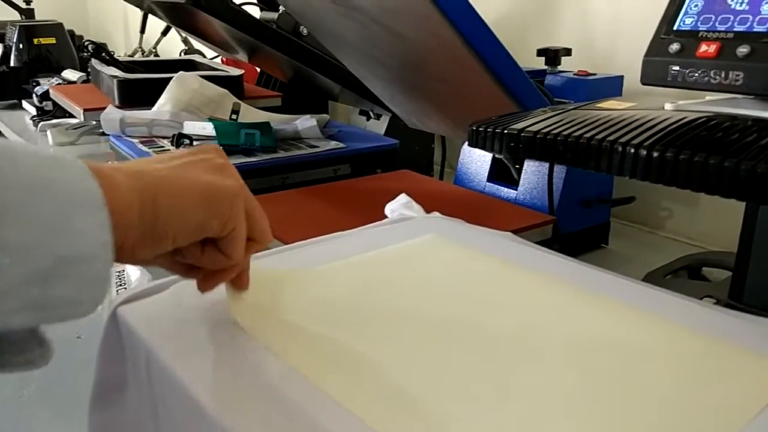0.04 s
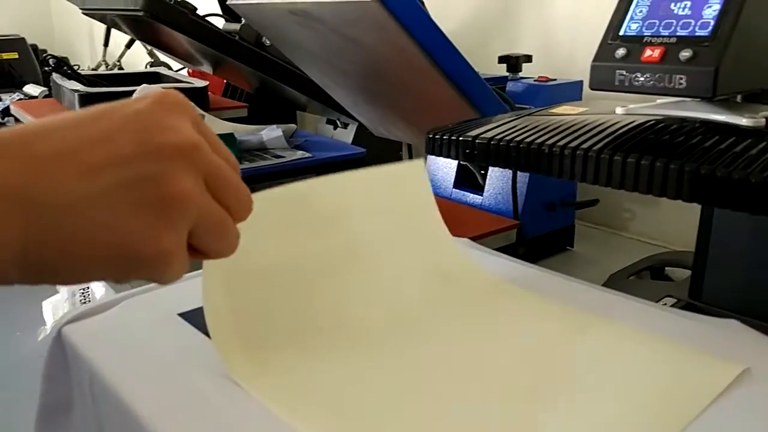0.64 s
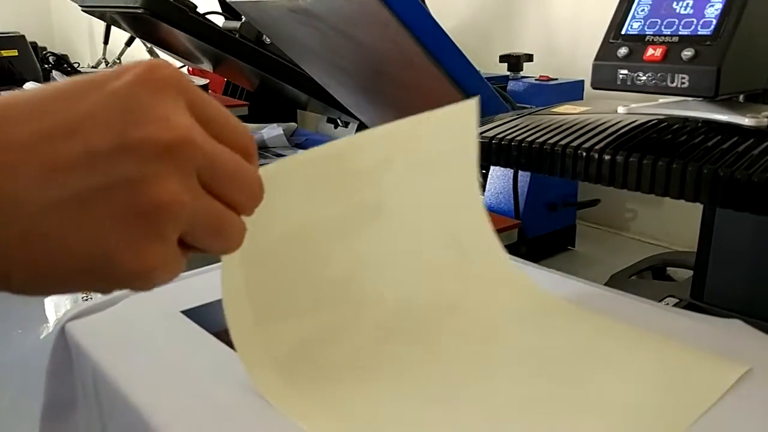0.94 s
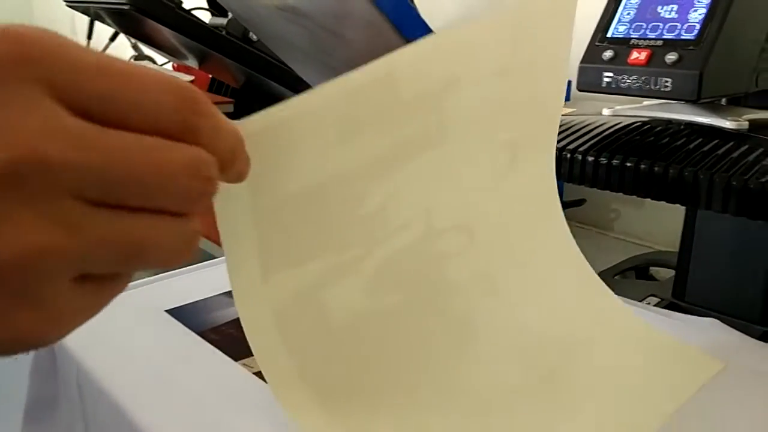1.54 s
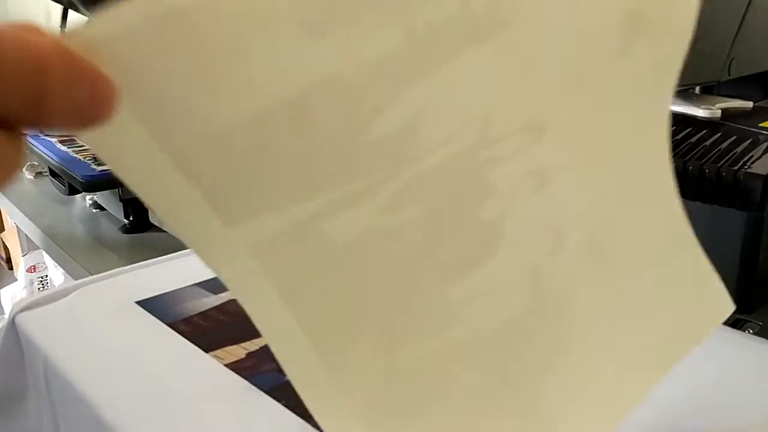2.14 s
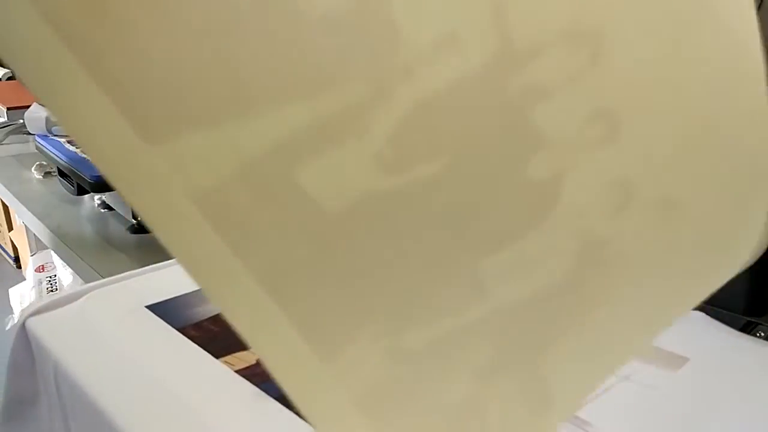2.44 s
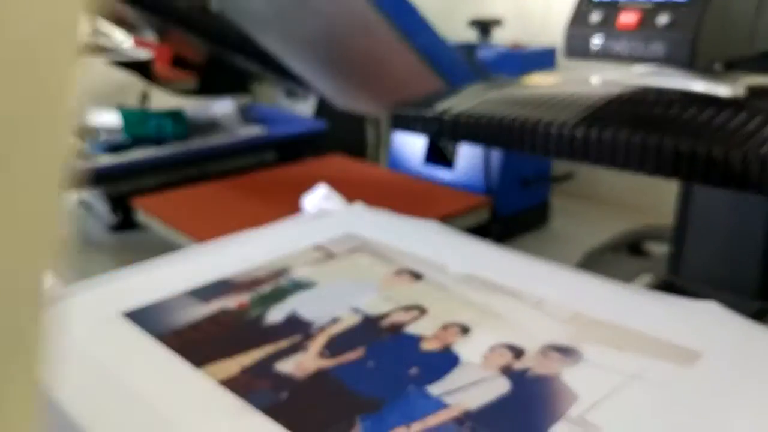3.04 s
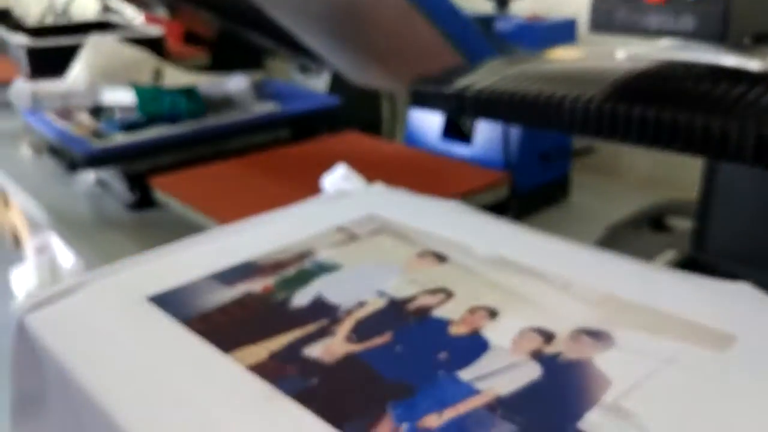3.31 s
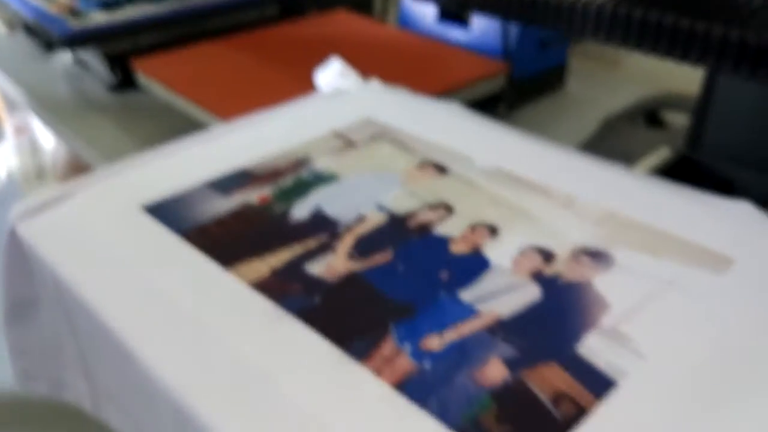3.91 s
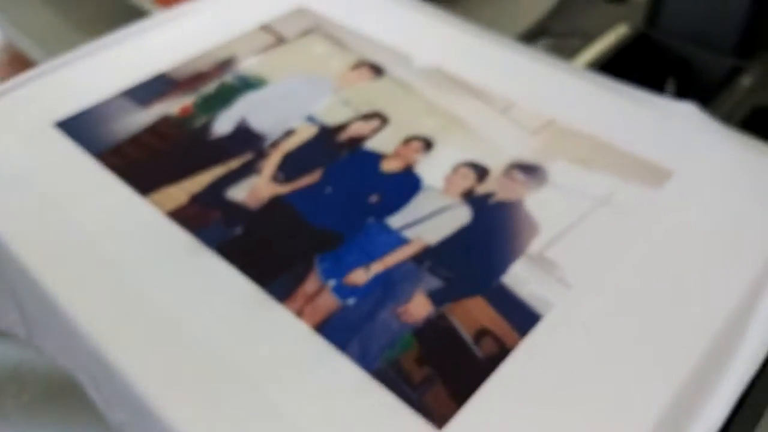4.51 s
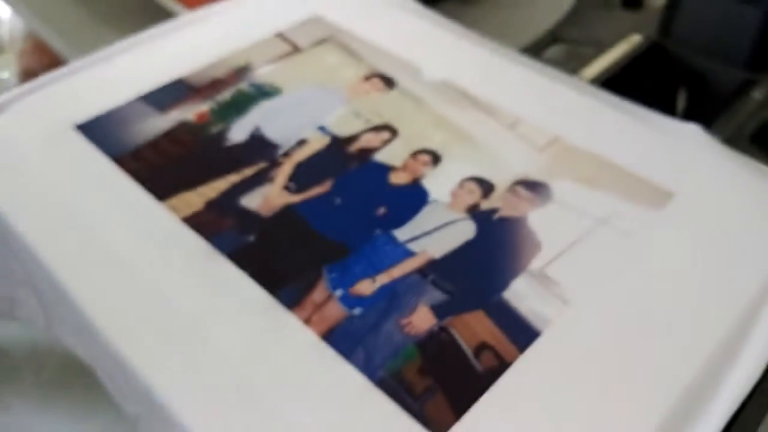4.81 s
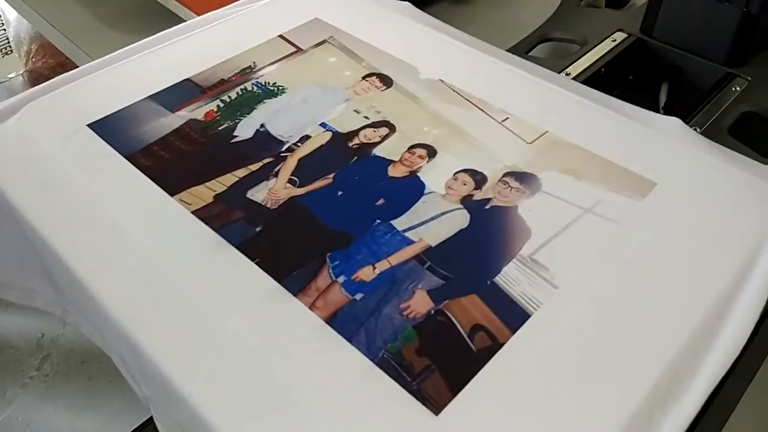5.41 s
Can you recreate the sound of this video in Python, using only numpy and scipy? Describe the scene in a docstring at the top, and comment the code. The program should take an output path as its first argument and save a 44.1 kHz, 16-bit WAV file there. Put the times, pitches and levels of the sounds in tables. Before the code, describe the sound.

A small pump on a heat press hums with a rattling buzz while transfer paper hisses faintly off a shirt. After a light tap, a switch snaps and the pump quickly runs down. About a second later something hollow clacks and bounces, and a dull knock follows. Soft paper and cloth rustles and a few faint ticks continue over the low rumble and hiss of a quiet workshop, all heard from nearby.

```python
"""A small pump on a heat press hums, its valves rattling the housing, while transfer paper hisses
off a printed shirt. After a light tap, a switch snaps at 1.8 s and the pump runs down in a few
last strokes. Near 2.7 s something hollow clacks and bounces, and a dull knock follows.
Then paper and cloth rustle softly, with a few faint ticks, over the rumble and hiss of the room."""
import sys
import numpy as np
from scipy import signal
from scipy.fft import irfft, next_fast_len
from scipy.io import wavfile

SR = 44100
rng = np.random.default_rng(int(sys.argv[2]) if len(sys.argv) > 2 else 0)


def unload_wav(signal):
    """Save mono or channel-first audio to the path in sys.argv[1] as 16-bit WAV at rate SR, clipped to [-1, 1]."""
    wavfile.write(
        sys.argv[1],
        SR,
        np.round(np.clip(np.atleast_2d(signal).T, -1, 1) * 32767).astype(np.int16),
    )


N = 249429
T = np.arange(N) / SR
SIDES = np.array([[1], [-1]])   # left, right
POWER_OFF_S, COAST_S = 1.845, 0.1735   # when the pump loses power, and how long it takes to stop


def from_db(db):
    """Turn decibels into a gain."""
    return 10 ** (np.asarray(db) / 20)


def unit_rms(x):
    """Scale a signal to an average power of 1."""
    return x / np.sqrt(np.mean(x ** 2) + 1e-20)


def at_hz(points, hz):
    """Read a curve between its points, on a log-frequency axis."""
    freqs, values = np.transpose(points)
    return np.interp(np.log(np.maximum(hz, 1)), np.log(freqs), values)


def drift(rate_hz):
    """A smooth random wander, about 1 in size."""
    step, warm_up = 40, 2000
    pole = np.exp(-2 * np.pi * rate_hz * step / SR)
    white = rng.standard_normal(N // step + warm_up + 2)
    slow = signal.lfilter([1], [1, -2 * pole, pole * pole], white)[warm_up:]
    return np.interp(np.arange(N) / step, np.arange(len(slow)), unit_rms(slow))


def without_bass(x):
    """Small things give off almost no bass."""
    return signal.sosfilt(signal.butter(4, 140, "high", fs=SR, output="sos"), x)


def pan(left_db):
    """Left and right gains that keep the total power the same."""
    gains = from_db(SIDES * left_db / 2)
    return gains / np.hypot(*gains)


def placed(pair, left_db, lead_s):
    """A source on the left is louder and earlier there; negative values put it on the right."""
    shift = round(lead_s * SR / 2)
    return from_db(SIDES * left_db / 2) * np.array([np.roll(pair[0], -shift), np.roll(pair[1], shift)])


# How alike the two sides sound. Each row: frequency in Hz, likeness from 0 to 1.
LIKENESS = [(145, 1), (300, 0.92), (630, 0.61), (1400, 0)]
# The lean to the left. Each row: frequency in Hz, left minus right in dB.
LEFT_TILT = [(200, 0.5), (600, 1), (1300, 1.2), (4300, 0.98), (8000, 3.2), (11000, 11.5), (14000, 17)]
def noise(spectrum, size=N):
    """Shaped stereo noise of power 1: alike on both sides in the bass, stronger left in the treble."""
    length = next_fast_len(size)
    hz = np.arange(length // 2 + 1) * SR / length
    shared, apart = np.exp(2j * np.pi * rng.random((2, len(hz))))
    alike = at_hz(LIKENESS, hz)
    pair = np.sqrt(1 + alike) * shared + np.sqrt(1 - alike) * apart * SIDES
    roll_off = np.minimum(hz / spectrum[0][0], 1) ** 2 * np.minimum(spectrum[-1][0] / (hz + 1), 1) ** 2
    colour = roll_off * from_db(at_hz(spectrum, hz))
    return unit_rms(irfft(pair * pan(at_hz(LEFT_TILT, hz)) * colour, length)[:, :size])


def impact(spectrum, t60, room_db, hardness=0.85, crack_s=0.0063):
    """One contact: a crack, a body that fades by 60 dB in t60 seconds, and the room's echo."""
    t, room_t60 = T[:SR // 2], 0.42
    crack, body, echo = from_db(-60 * t / np.array([[crack_s], [t60], [room_t60]]))
    envelope = np.sqrt((hardness * crack) ** 2 + body ** 2 + (from_db(room_db) * echo) ** 2)
    return unit_rms(without_bass(noise(spectrum, len(t)) * envelope)) / np.sqrt(len(t))


def blows(hits, spectrum, t60, room_db, hardness=0.67, crack_s=0.008):
    """Every blow shakes the same object a little differently."""
    out = np.zeros((2, N + SR))
    for start_s, level_db in hits:
        sound = from_db(level_db) * impact(spectrum, t60, room_db, hardness, crack_s)
        start = int(start_s * SR)
        out[:, start:start + sound.shape[1]] += sound
    return out[:, :N]


def ring(notes, start_s, scatter_rad=0):
    """Fading pure tones struck together; scattering around the room can make them waver."""
    out, t = np.zeros((2, N)), T[:SR // 2]
    start = int(start_s * SR)
    for hz, level_db, t60 in notes:
        fade = from_db(level_db - 60 * t / t60)
        waver = scatter_rad * np.array([drift(70)[:len(t)] for _ in SIDES]) if scatter_rad else 0
        tone = np.sin(2 * np.pi * hz * t + waver)
        out[:, start:start + len(t)] += pan(at_hz(LEFT_TILT, hz)) * fade * tone
    return out


# The room's hiss and its deep rumble. Each row: frequency in Hz, relative level in dB.
ROOM_COLOUR = [(59, -53), (100, -30), (123, -64), (137, -19), (155, -2), (235, 0.5), (283, 0.5),
               (308, -4.5), (387, -2), (497, -7), (988, -10.5), (1300, -16), (2520, -16), (11500, -20.5),
               (14500, -34)]
RUMBLE_COLOUR = [(20, -16), (50, -32), (80, 16), (110, 18), (140, -11)]
def workshop():
    """Steady room noise with an uneven low boom."""
    boom = noise([(150, -21), (200, 3.5), (260, -3.5), (400, -10.5)]) * from_db(3.5 * drift(34))
    return from_db(-47.5) * noise(ROOM_COLOUR) + from_db(-87) * noise(RUMBLE_COLOUR) + from_db(-57) * boom


# Sliding paper and sliding cloth. Each row: frequency in Hz, relative level in dB.
PAPER_COLOUR = [(3000, -41), (6000, -6), (9000, 4), (12000, 10), (13200, 5), (14200, 0)]
CLOTH_COLOUR = [(1200, -16), (2500, 2), (4500, 0), (7000, -0.5), (10500, 0.5), (12500, -23)]
# Slides. Each row: middle in seconds, half length in seconds, relative paper and cloth levels in dB.
SLIDES = [(2.437, 0.042, -51.5, -53.5), (3.233, 0.08, -51, -54), (3.475, 0.085, -55, -50.5),
          (4.61, 0.045, -56, -49), (5.2, 0.47, -67, -51.5)]
def sliding():
    """Paper hisses as it peels and slides, cloth is duller; each slide swells and fades."""
    rise_s, peel_end_s, fade_s = 0.52, 1.27, 0.9
    peel = np.minimum(T / rise_s, 1) * np.exp(-np.maximum(T - peel_end_s, 0) / fade_s)
    paper, cloth = from_db(-57.5), from_db(-59.5)   # faint rustle between the movements
    paper = np.hypot(paper, from_db(-50.5) * peel)
    for middle_s, half_s, paper_db, cloth_db in SLIDES:
        swell = np.exp(-0.5 * ((T - middle_s) / half_s) ** 2)
        paper = np.hypot(paper, from_db(paper_db) * swell)
        cloth = np.hypot(cloth, from_db(cloth_db) * swell)
    return paper * noise(PAPER_COLOUR) + cloth * noise(CLOTH_COLOUR)


# Brief rubs. Each row: start in seconds, level in dB, fade time in seconds.
RUBS = [(0.725, -43.5, 0.018), (2.66, -46.5, 0.026), (4.228, -41, 0.011), (4.248, -46, .016),
        (4.289, -44, 0.0061), (4.304, -39, 0.02), (4.458, -40, 0.025), (4.479, -41.5, 0.018),
        (4.515, -49, 0.028)]
# The sound of a rub. Each row: frequency in Hz, relative level in dB.
RUB_COLOUR = [(1000, -13), (2200, -1.5), (2850, -8), (3250, 3.5), (3800, -20), (4600, -2), (5500, -6),
              (5950, 4), (7400, 4.5), (8500, -3), (9200, -8), (11000, -1.5), (14000, -11)]
def rubs(catch_s=0.0027, slips_per_s=1300, spread_db=2):
    """Cloth and paper catch quickly, then let go in a shower of tiny slips."""
    pressure = 0
    for start_s, level_db, fade_s in RUBS:
        catch = np.clip((T - start_s) / catch_s, 0, 1)
        let_go = np.exp(-np.maximum(T - start_s - catch_s, 0) / fade_s)
        pressure += from_db(level_db) * catch * let_go
    slips = (rng.random(N) < slips_per_s / SR) * rng.choice([-1, 1], N)
    slips = unit_rms(slips * from_db(spread_db * rng.standard_normal(N)))
    one_slip = impact(RUB_COLOUR, t60=0.018, room_db=-22)
    return placed(signal.fftconvolve([pressure * slips], one_slip, axes=1)[:, :N], left_db=0.5, lead_s=0)


# Light taps. Each row: start in seconds, level in dB.
TAP_HITS = [(1.245, -10.5), (4.054, -24.5)]
# The sound of a tap. Each row: frequency in Hz, relative level in dB.
TAP_COLOUR = [(600, 4), (1200, 3), (2200, 3), (4100, -3), (4800, -16)]
def taps():
    """Two light contacts that die away at once."""
    return blows(TAP_HITS, TAP_COLOUR, t60=0.028, room_db=-20)


# The bouncing knock, and the ticks. Each row: start in seconds, relative level in dB.
KNOCK_HITS = [(2.8955, -12), (2.902, -9.5), (2.914, -10.5), (2.934, -18), (2.96, -12), (2.98, -22)]
TICK_HITS = [(2.8955, -5), (2.898, -3.5), (3.812, -19), (4.971, -16)]
# The sound of each. Each row: frequency in Hz, relative level in dB.
KNOCK_COLOUR = [(100, -30), (210, 5), (380, 1.5), (700, 4.5), (1300, -2.5), (1900, -16), (3000, -25),
                (8000, -39)]
TICK_COLOUR = [(600, 7), (1500, 2.5), (3000, -5.5), (4600, -8), (6200, 8), (7500, -2), (9200, 8.5),
               (11000, 0), (13000, 6), (14500, 8)]
def knock_and_ticks():
    """A dull knock that bounces and settles, and sharp ticks from the same side."""
    knock = blows(KNOCK_HITS, KNOCK_COLOUR, t60=0.092, room_db=-8, hardness=0.8)
    ticks = blows(TICK_HITS, TICK_COLOUR, t60=0.06, room_db=-38, hardness=2.5)
    return placed(knock + ticks, left_db=-7.5, lead_s=-0.00028)


# The clack and its bounces. Each row: start in seconds, relative level in dB.
CLACK_HITS = [(2.7045, -8.5), (2.709, -8.5), (2.721, -8.5), (2.742, -10)]
# The hollow body. Each row: frequency in Hz, relative level in dB.
CLACK_COLOUR = [(150, -14), (450, -6), (580, -2), (680, 5), (900, -1.5), (1200, 0), (1700, -8),
                (2250, -6.5), (2900, -9), (3900, -13), (5500, -25), (12000, -42)]
# Its ringing. Each row: pitch in Hz, relative level in dB, seconds to fade by 60 dB.
CLACK_NOTES = [(665, -27, 0.08), (565, -35, 0.11), (960, -27, 0.069), (1140, -31.5, .063),
               (2240, -21, 0.04)]
def clack():
    """Something hollow is struck, rings and rattles; the last bounces are softer and duller."""
    hard = blows(CLACK_HITS[:2], CLACK_COLOUR, t60=0.077, room_db=-17, hardness=0.7)
    bounces = blows(CLACK_HITS[2:], CLACK_COLOUR, t60=0.17, room_db=-21, hardness=0.6)
    dulled = signal.sosfilt(signal.butter(2, 2160, fs=SR, output="sos"), bounces)
    ringing = sum(from_db(level_db) * ring(CLACK_NOTES, start_s) for start_s, level_db in CLACK_HITS)
    return placed(from_db(1.5) * (hard + dulled) + from_db(-1.5) * ringing, left_db=-4, lead_s=-0.00018)


# The switch snaps and its contacts bounce. Each row: start in seconds, level in dB.
SWITCH_HITS = [(1.8379, 0.5), (1.8407, -0.5), (1.8434, -2)]
# The sound of the snap. Each row: frequency in Hz, relative level in dB.
SWITCH_COLOUR = [(200, -10), (1500, -7), (2400, -15), (3000, 6), (4000, -0.5), (5200, 7.5), (5800, -22),
                 (6500, -14), (7500, -4), (8300, 4.5), (9200, 10.5), (10200, -1.5), (11700, 10.5),
                 (13600, 4), (14100, -3)]
# Its metal parts. Each row: pitch in Hz, level in dB, seconds to fade by 60 dB.
SWITCH_NOTES = [(2960, -35, .05), (3150, -30, .022), (3960, -28, .02), (4800, -30, .03), (5270, -35, .26),
                (7634, -52, .3), (8950, -47, .22), (10803, -49, .25), (11720, -42, .13), (13550, -40, .26)]
def switch():
    """A hard snap; as the latch lands it sets small metal parts ringing one after another."""
    snap = blows(SWITCH_HITS, SWITCH_COLOUR, t60=0.04, room_db=-10, hardness=2.8, crack_s=0.009)
    return snap + sum(ring([note], rng.uniform(1.8392, 1.843), scatter_rad=1.1) for note in SWITCH_NOTES)


# Each row: start in seconds, relative level in dB, length in seconds, first and last pitch in Hz.
STROKES = [(1.863, -26, 0.015, 523, 540), (1.874, -31.5, 0.028, 601, 755), (1.9, -26, 0.015, 349.3, 328),
           (1.931, -31.5, .016, 260, 281), (1.940, -36, 0.029, 512, 330), (1.976, -31.5, 0.021, 340, 245),
           (2.056, -36.5, 0.022, 312, 270)]
# The thud of one stroke. Each row: frequency in Hz, relative level in dB.
THUD_COLOUR = [(130, -36), (180, -11), (230, 3), (290, -2), (360, 4), (430, -6), (520, -0.5), (700, -7),
               (1000, -14), (3000, -23.5)]
def last_strokes(thud_db=20, roughness_rad=0.4):
    """Each of the pump's final strokes is a short, rough, gliding gulp over a thud of the housing."""
    gulps, hits = 0, []
    for start_s, level_db, length_s, first_hz, last_hz in STROKES:
        progress = np.clip((T - start_s) / length_s, 0, 1)
        cycles = np.cumsum(first_hz + (last_hz - first_hz) * progress) / SR
        tone = np.sin(2 * np.pi * cycles + roughness_rad * drift(100))
        gulps += from_db(level_db) * np.sin(np.pi * progress) * tone
        hits.append((start_s, level_db + thud_db))
    thuds = blows(hits, THUD_COLOUR, t60=0.071, room_db=-1, hardness=0)
    return placed(without_bass(gulps + thuds), left_db=0.5, lead_s=0.00018)


# Air in the pump. Each row: frequency in Hz, relative level in dB.
AIR_COLOUR = [(60, -53), (110, -2.5), (150, -12), (210, -2.5), (300, -3.5), (430, -4.5), (650, -6.5),
              (1000, -8), (1500, -12), (2000, -11), (2500, -18), (6000, -23.5), (11500, -23.5),
              (14000, -41)]
def air_rush(turns, outlet_turn):
    """Rushing air throbs once a turn with the outlet valve, and its level flickers a little."""
    throb = 1 + 0.35 * np.cos(2 * np.pi * (turns - outlet_turn))
    return without_bass(noise(AIR_COLOUR) * throb) * from_db(1.3 * drift(14))


def valve(turns, point_in_turn, spread_db=1.3):
    """A valve clicks at the same point in every turn of the shaft, never twice equally hard."""
    when = np.interp(np.arange(int(turns[-1])) + point_in_turn, turns, np.arange(N))
    strength = from_db(spread_db * rng.standard_normal(N)[:len(when)])
    sample, late = when.astype(int), when % 1   # the two nearest samples share each click
    before = np.bincount(sample, strength * (1 - late), N + 1)
    after = np.bincount(sample + 1, strength * late, N + 1)
    return (before + after)[:N]


# The ringing housing. Each row: frequency in Hz, relative level in dB.
HOUSING_COLOUR = [(1700, -14), (2000, 4.5), (2400, -7), (2850, 9.5), (3100, 7.5), (3250, -10), (3430, 5.5),
                  (3900, -8), (4300, -4.5), (4750, 6), (5600, -9.5), (7200, -1.5), (8000, -8.5), (10900, 5),
                  (11300, 0), (11750, 9), (12300, -5), (13200, 1), (14000, -9)]
def housing_buzz(clicks, paths=5):
    """Clicks ring the housing; the sound's path shifts as the paper rises, so overtones come and go."""
    position = (paths - 1) * np.minimum(T / POWER_OFF_S, 1)
    buzz = 0
    for path in range(paths):
        share = np.cos(np.pi / 2 * np.minimum(abs(position - path), 1))
        one_click = impact(HOUSING_COLOUR, t60=0.027, room_db=1)
        buzz += signal.fftconvolve([clicks * share], one_click, axes=1)[:, :N]
    return buzz


# The hum's tones. Each row: multiple of the shaft speed (rounded when played), then relative
# levels in dB with the paper flat, half lifted and lifted.
HUM_TONES = [(2, -17.5, -15, -17.5), (3, 0.0, 1, -0.5), (4, -8.5, -14.5, -19.5), (5, -7, -5, -4.5),
             (6, -11.5, -10.5, -9.5), (7, -23.5, -10.5, -13), (8, -11, -13.5, -15), (9, -10, -8, -7),
             (10, -12.5, -13, -12.5), (11, -18, -13.5, -25), (12, -22, -23, -24), (13, -39, -25, -26.0),
             (14, -14, -20, -15), (15, -23, -24, -28), (16, -25.5, -18.5, -15.5), (17, -20.5, -24, -21),
             (18, -35, -36, -35), (19, -21, -32, -37), (20, -30, -17, -20), (21, -24.5, -32, -39),
             (23, -20.0, -20, -27), (24, -26, -24, -31), (25, -19.5, -23.5, -27.5), (26, -18.5, -27, -24),
             (27, -26, -28, -28.5), (27.8, -20.5, -23, -35)]
# Where each tone sits. Each row: frequency in Hz, left minus right in dB.
HUM_PAN = [(300, -0.5), (390, 4.5), (480, 3.5), (700, 4.5), (940, 2.5), (1090, -8), (1250, 10), (1330, -11),
           (1560, -5), (1800, 3)]
# Each tone's timing. Each row: frequency in Hz, how far the left runs ahead in radians.
HUM_LEAD = [(233, -0.5), (390, 0.5), (860, 1.46), (1100, 3), (1350, 2.5), (2000, 1.5)]
def hum(turns, level_db=-27.5, waver_db=1.9, flutter_db=1.2, sway_db=8):
    """The shaft's tones line up into two pulses a turn; their mix shifts as paper and microphone move."""
    out, size = np.zeros((2, N)), int((POWER_OFF_S + COAST_S) * SR)
    lift_s = (0.35, 0.88, 1.3)   # paper flat, half lifted, lifted
    for multiple, *lift_db in HUM_TONES:
        multiple = round(multiple)
        hz = multiple * SHAFT_SPEED[-1][1]
        unsteady = multiple / HUM_TONES[-1][0]   # short waves feel small movements most
        wobble_db = waver_db * unsteady * drift(3.2) + flutter_db * np.sqrt(unsteady) * drift(15)
        gain = from_db(level_db + np.interp(T, lift_s, lift_db) + wobble_db)
        balance = pan(at_hz(HUM_PAN, hz) + sway_db * unsteady * drift(0.34))
        # the housing holds low notes longest; odd multiples lag, which splits the pulse in two
        lag_cycles = 3.3 * np.log(multiple) + 0.04 * (multiple % 2) + 0.35 * unsteady * rng.random()
        tone = np.sin(2 * np.pi * (multiple * turns - lag_cycles) + at_hz(HUM_LEAD, hz) * SIDES / 2)
        out[:, :size] += (gain * balance * tone)[:, :size]
    return out


# The pump's shaft under power. Each row: time in seconds, turns per second.
SHAFT_SPEED = [(0, 77.12), (0.5, 77.48), (1.0, 77.92), (1.5, 78.24), (1.84, 78.32)]
def pump(outlet_turn=0.36, inlet_turn=0.94, fall_db=73):
    """One shaft drives the hum, the two valves and the air; all die away as it stalls."""
    full_speed = np.interp(T, *np.transpose(SHAFT_SPEED))
    coasted = np.clip((T - POWER_OFF_S) / COAST_S, 0, 1)
    turns = np.cumsum(full_speed * (1 - coasted ** 3)) / SR
    effort = from_db(-fall_db * coasted ** 2) * (coasted < 1)
    clicks = valve(turns, outlet_turn) + from_db(-6) * valve(turns, inlet_turn)
    air = from_db(-46) * air_rush(turns, outlet_turn)
    return effort * (hum(turns) + air) + from_db(-20.5) * housing_buzz(effort * clicks)


def scene():
    """The pump and its stop, the paper and cloth, the room and the knocks, added together."""
    machine = pump() + switch() + last_strokes()
    handling = taps() + rubs() + from_db(-1) * sliding()
    return machine + handling + workshop() + clack() + knock_and_ticks()


def record(dry):
    """The highest treble is cut off steeply."""
    return signal.sosfilt(signal.ellip(12, 0.2, 75, 14350, fs=SR, output="sos"), dry)


dry = scene()
out = record(dry)
unload_wav(out)
```